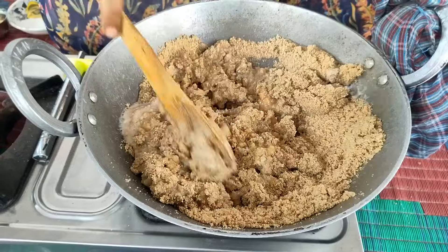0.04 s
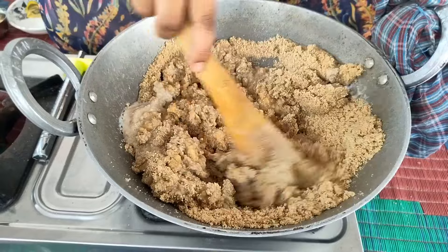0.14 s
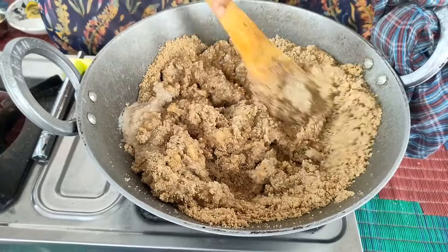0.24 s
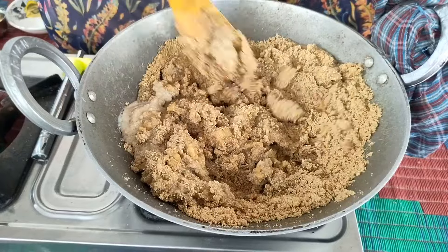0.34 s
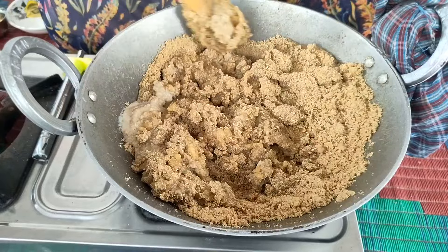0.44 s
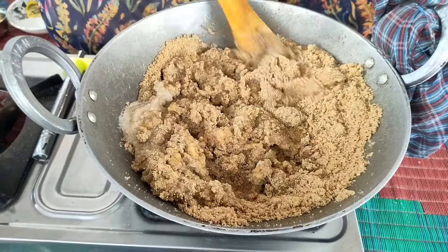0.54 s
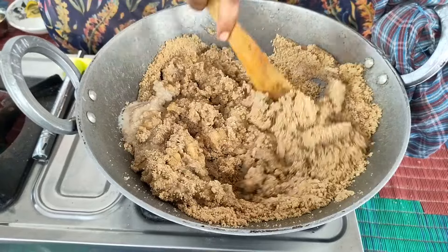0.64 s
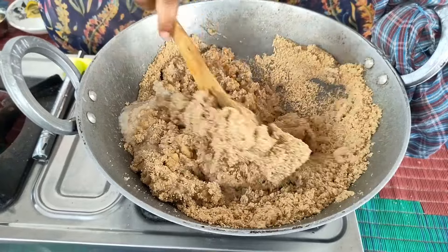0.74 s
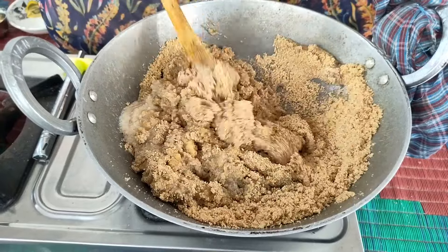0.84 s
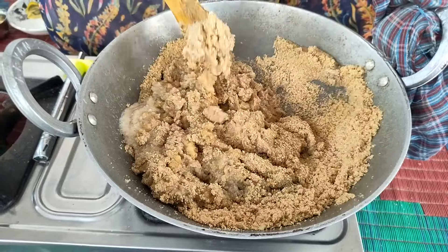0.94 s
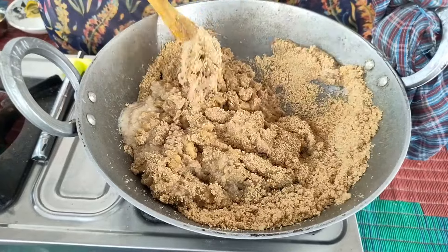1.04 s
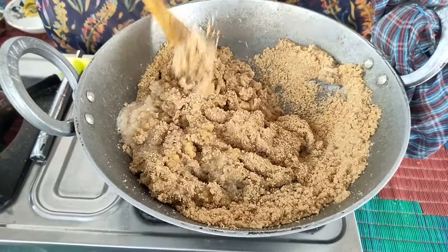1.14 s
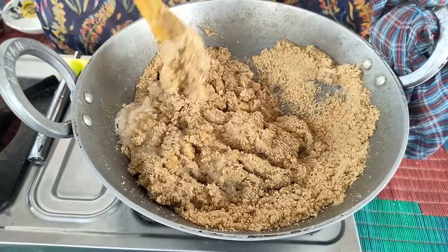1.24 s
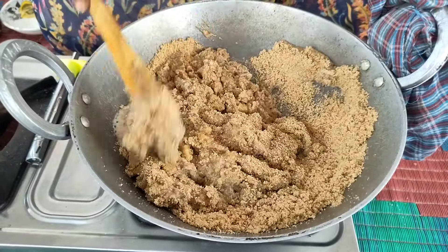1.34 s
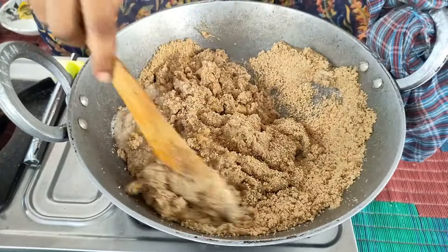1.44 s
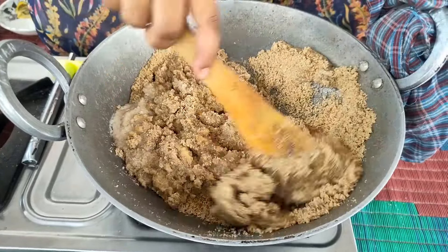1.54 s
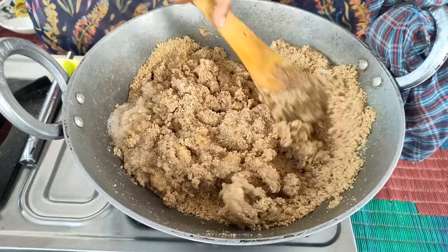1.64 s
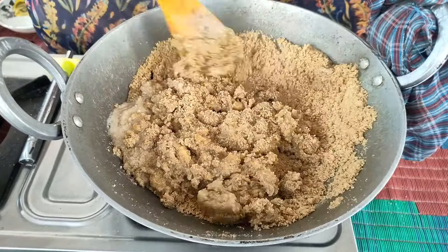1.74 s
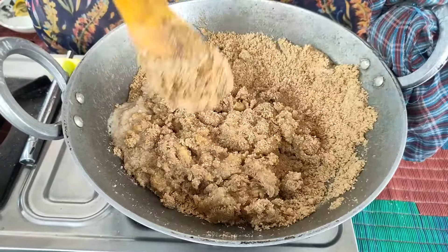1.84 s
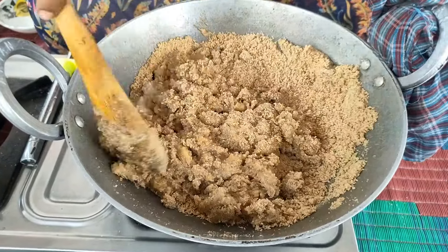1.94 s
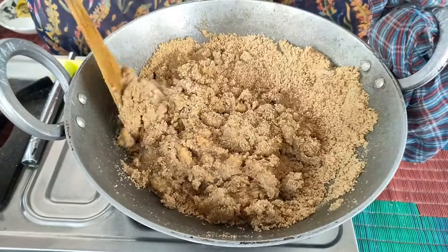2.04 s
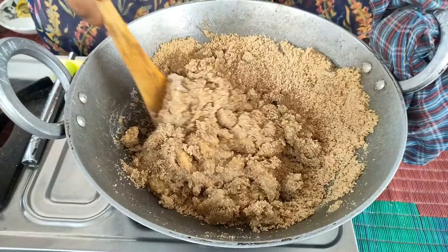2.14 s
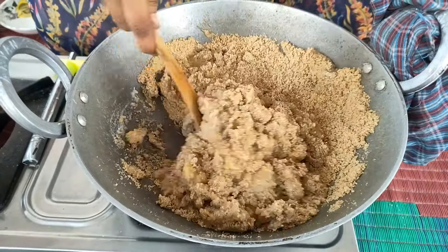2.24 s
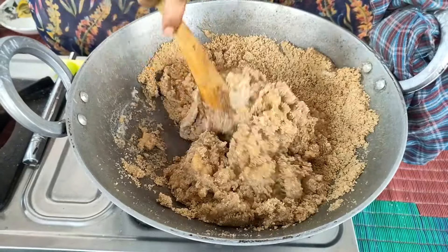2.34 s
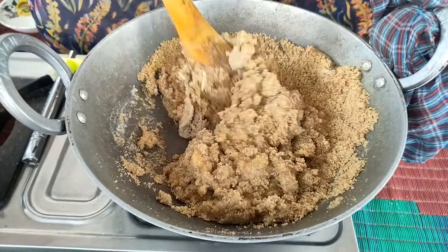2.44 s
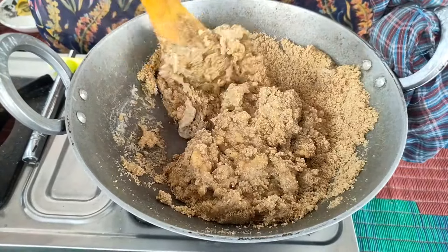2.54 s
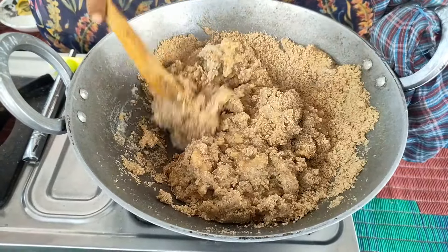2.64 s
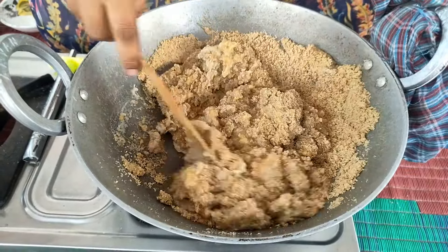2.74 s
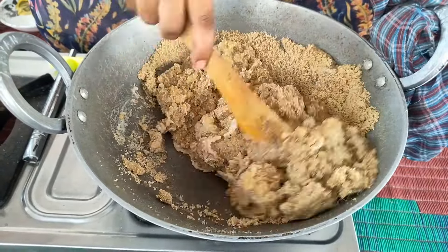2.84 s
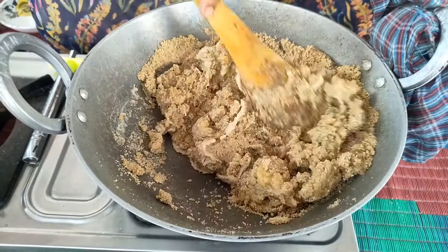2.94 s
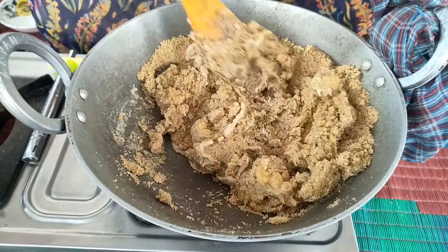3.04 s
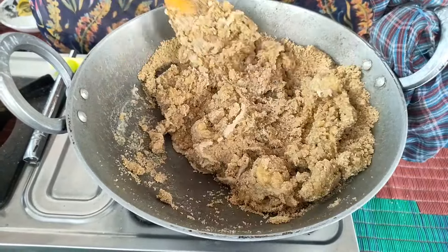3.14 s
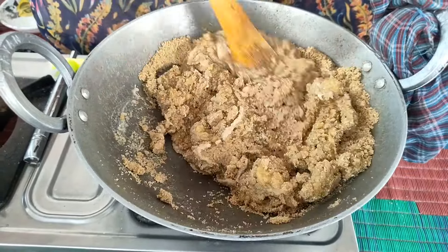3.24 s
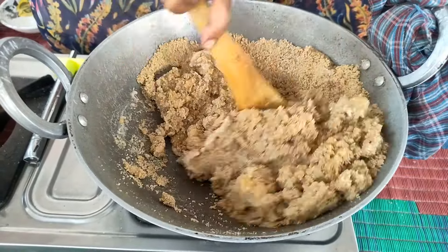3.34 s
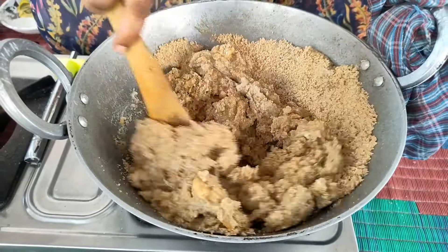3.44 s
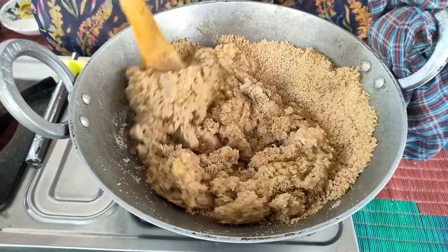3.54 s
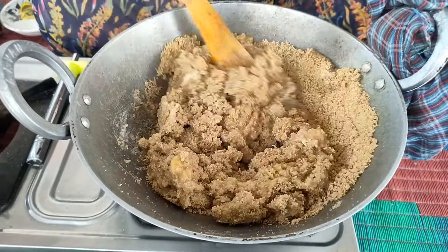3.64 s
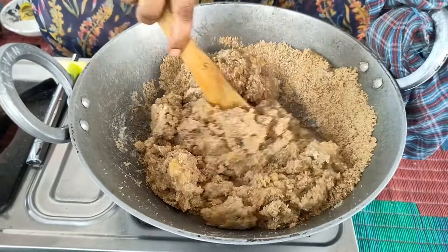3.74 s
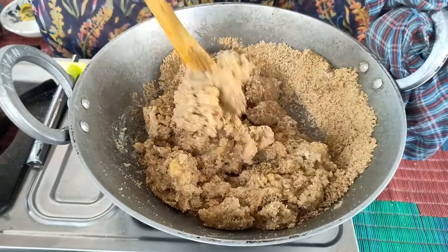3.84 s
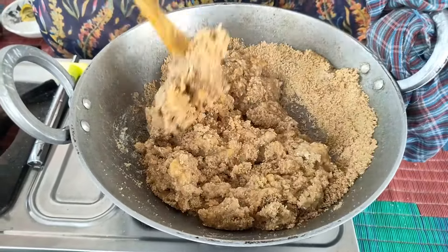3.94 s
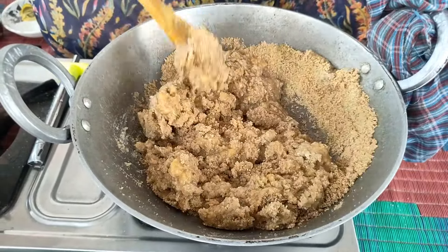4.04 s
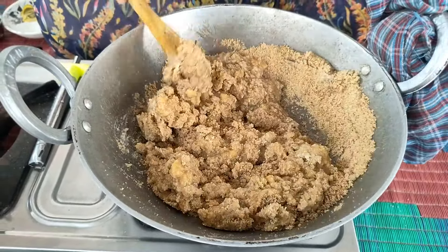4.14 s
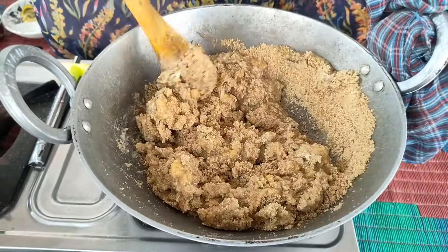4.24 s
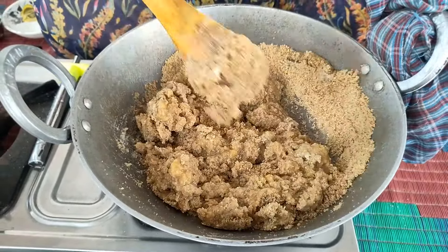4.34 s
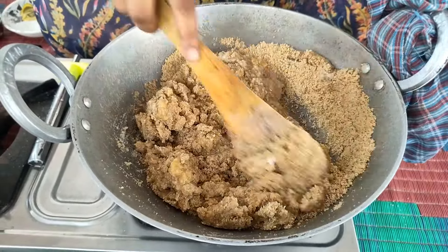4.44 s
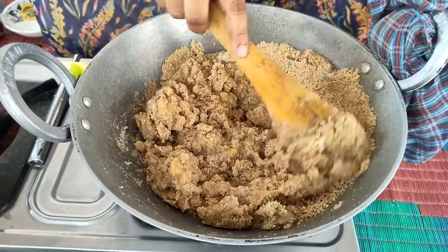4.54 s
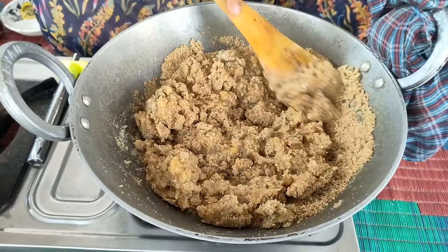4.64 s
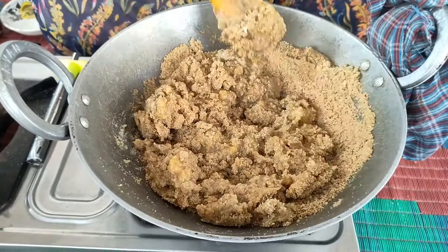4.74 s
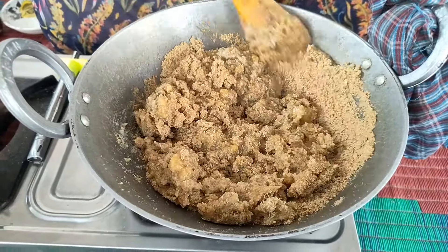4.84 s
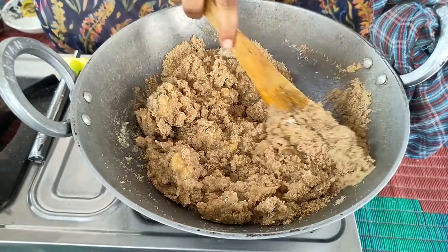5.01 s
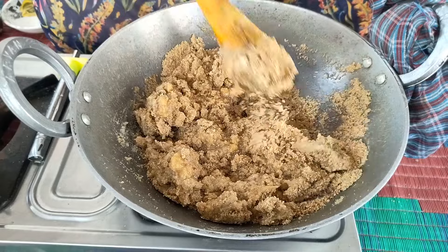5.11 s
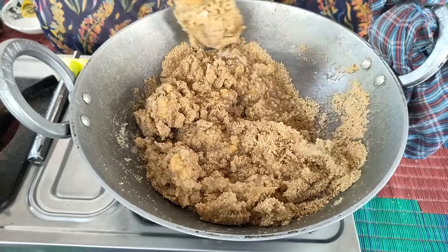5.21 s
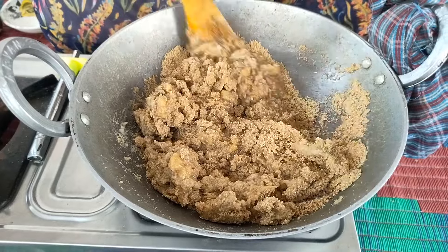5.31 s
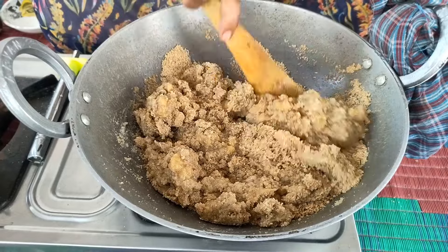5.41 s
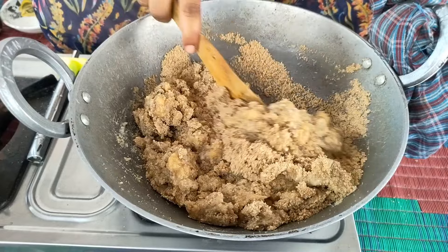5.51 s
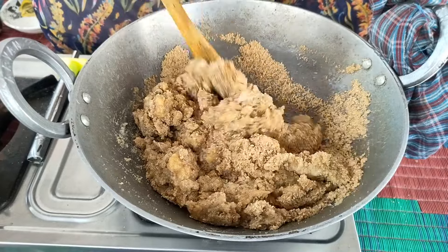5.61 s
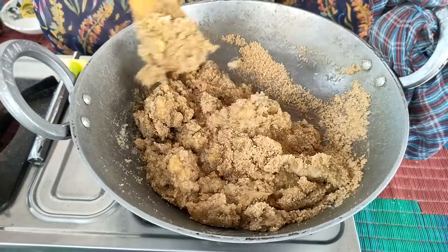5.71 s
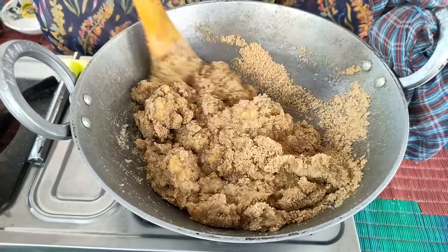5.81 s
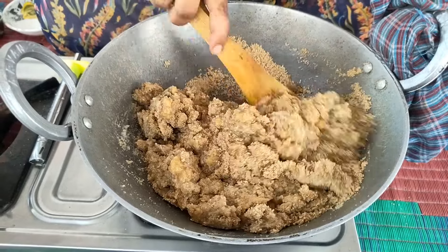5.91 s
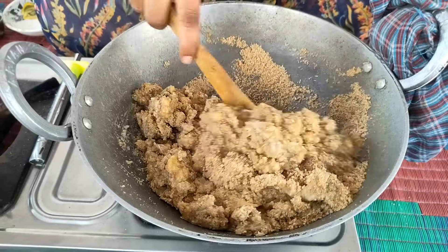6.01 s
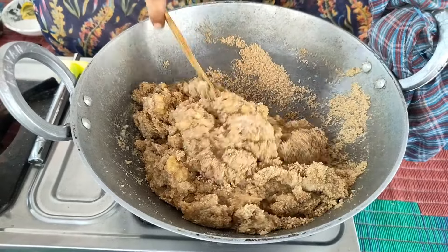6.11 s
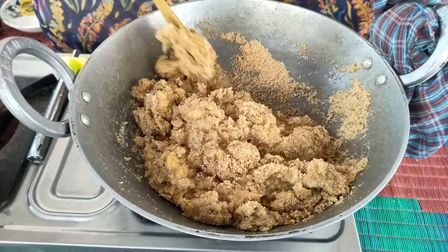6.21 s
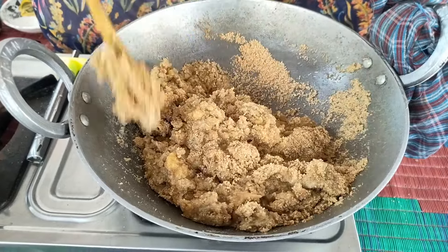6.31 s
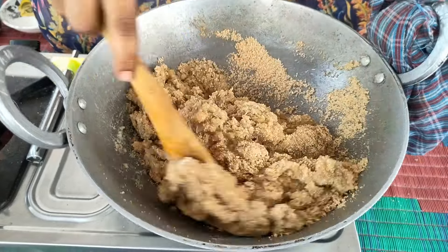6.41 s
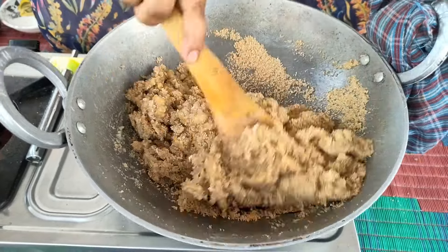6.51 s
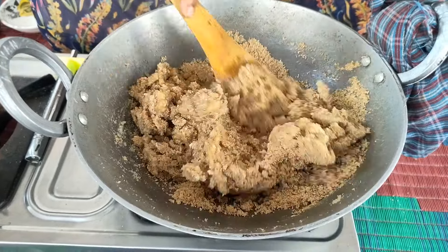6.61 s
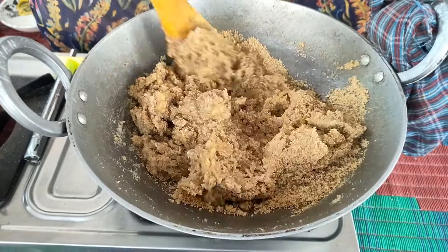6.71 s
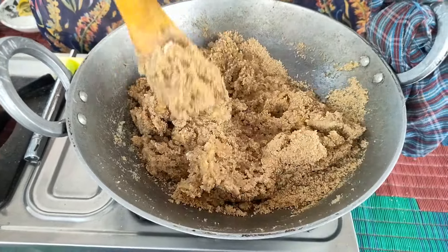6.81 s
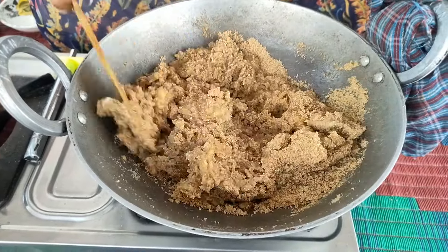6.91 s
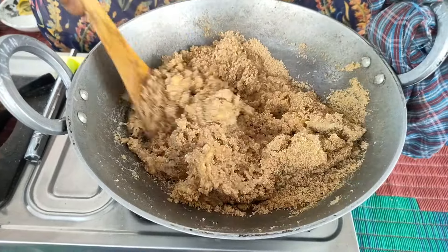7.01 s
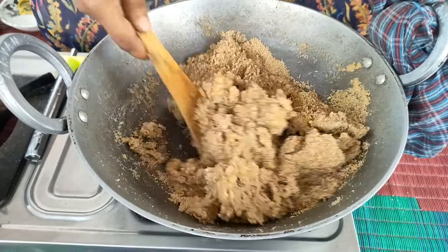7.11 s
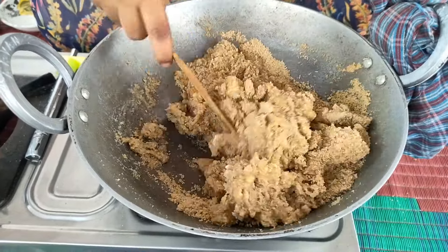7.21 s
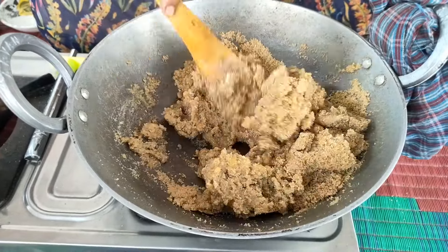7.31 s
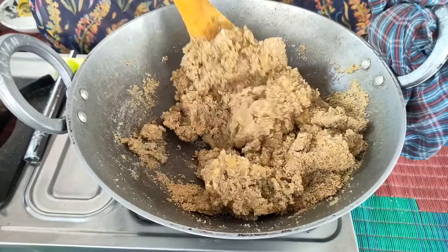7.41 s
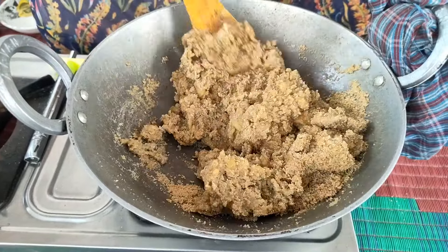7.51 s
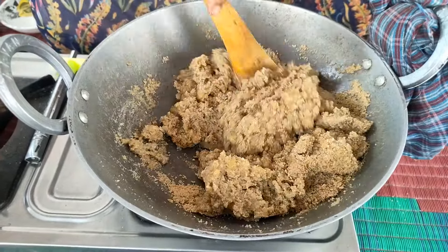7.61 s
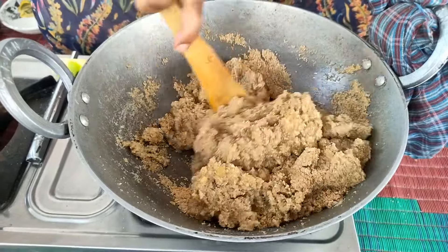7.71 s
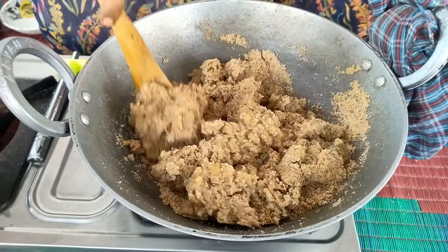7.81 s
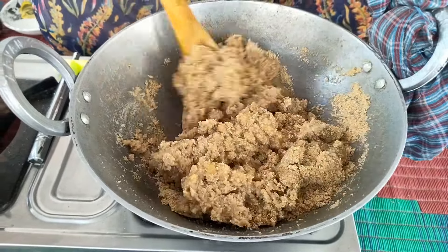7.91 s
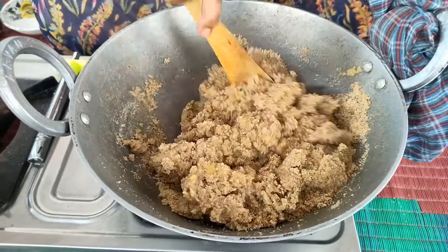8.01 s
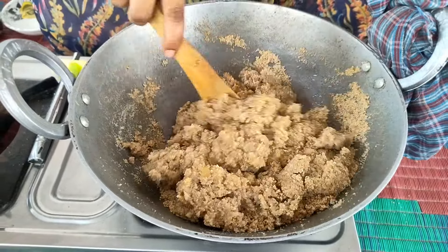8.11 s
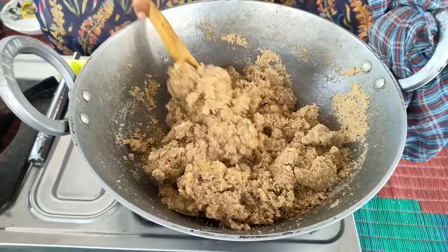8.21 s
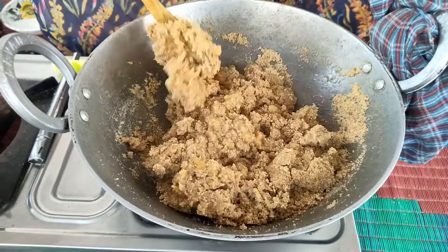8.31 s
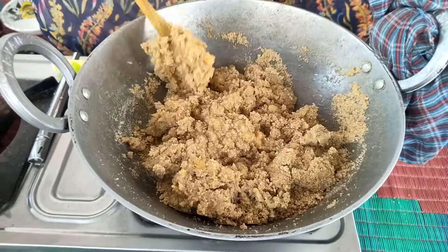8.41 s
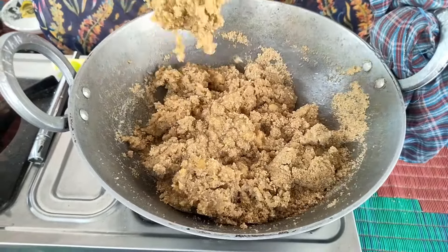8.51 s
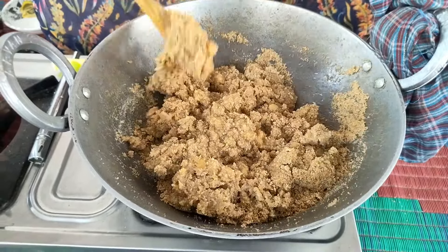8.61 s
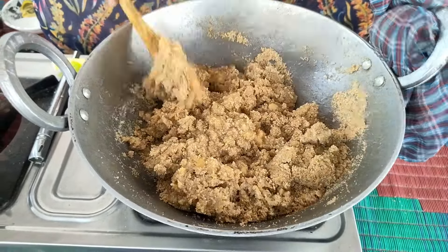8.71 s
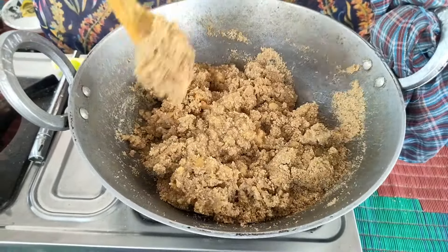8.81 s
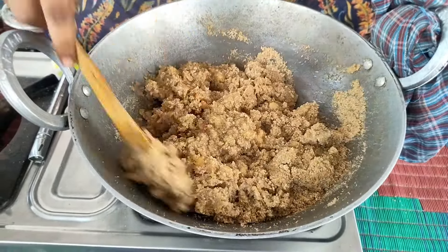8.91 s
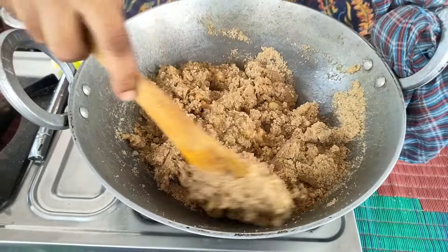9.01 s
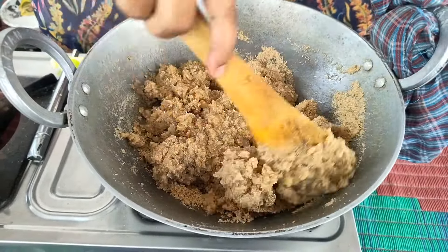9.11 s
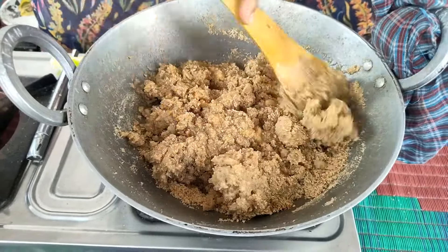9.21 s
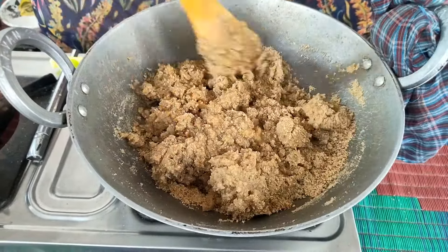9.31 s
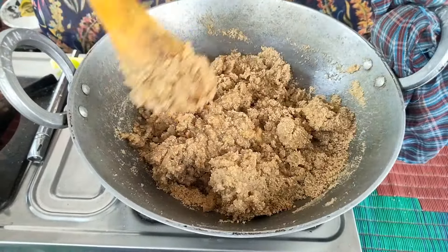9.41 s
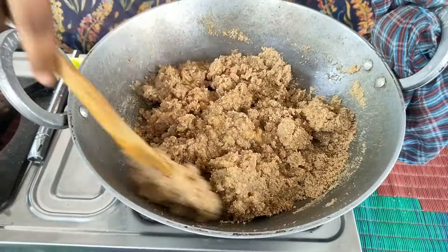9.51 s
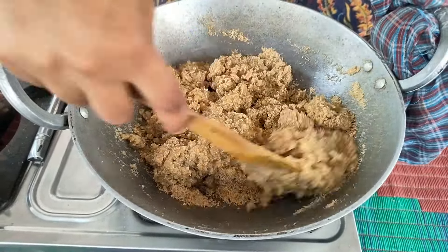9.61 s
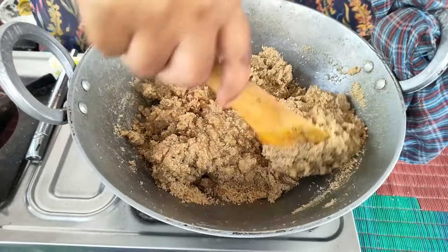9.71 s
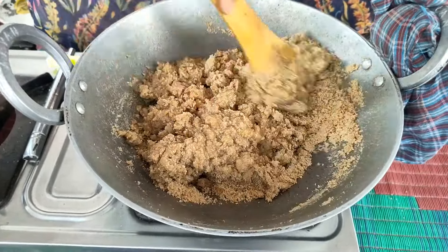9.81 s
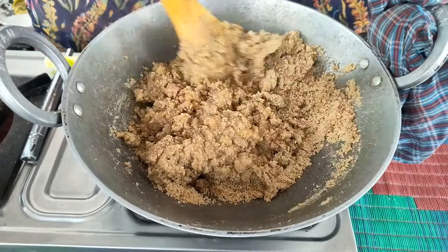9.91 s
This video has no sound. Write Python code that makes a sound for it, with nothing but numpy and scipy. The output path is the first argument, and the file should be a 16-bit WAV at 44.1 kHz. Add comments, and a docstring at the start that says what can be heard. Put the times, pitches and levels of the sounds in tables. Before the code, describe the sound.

Close up in a small home kitchen, a wooden spatula stirs crumbly dough in a metal pan with short, gritty scrapes and soft presses. Two loud raps on the rim come early, a small cluster before the middle and the hardest pair near the end, each making the pan rattle and clunk on its stand. A faint sizzle, low mains hum and tiny bird chirps outside lie underneath.

```python
"""In a small kitchen, close by, a wooden spatula stirs thick, crumbly dough in a metal pan on a stove.
Streams of tiny random impulses, filtered, make it scrape, crumble and press; narrow bands squeak on the wall.
Bursts of raps on the rim are ringing tones and noise; they rock the pan, whose modes ring on its stand.
Filtered grains make a faint frying hiss; a mains hum (a wavering sine) runs under quiet noise for the air.
A small bird chirps faintly outside: short gliding tones with an echo."""
import sys
import numpy as np
from scipy import signal
from scipy.fft import rfft, irfft, next_fast_len
from scipy.io import wavfile
from scipy.ndimage import uniform_filter1d, minimum_filter1d, map_coordinates

SR = 44100
rng = np.random.default_rng(int(sys.argv[2]) if len(sys.argv) > 2 else 0)


def wav_record(signal):
    """Record a signal, one row per channel, as 16-bit PCM in the file named by sys.argv[1]."""
    frames = np.transpose(np.atleast_2d(signal))
    bounded = np.clip(frames, -1, 1)
    # unit amplitude maps onto the largest positive 16-bit level
    quanta = np.round(bounded * 32767).astype(np.int16)
    wavfile.write(sys.argv[1], SR, quanta)


N = 438794  # length in samples

# Levels in the tables are relative: each function adds its own trim in dB.


def amp(db):
    """Turn decibels into a gain."""
    return 10 ** (np.asarray(db) / 20)


def unit(x):
    """Scale to an rms of 1."""
    return x / np.sqrt(np.mean(x ** 2) + 1e-20)


def along(points, hz):
    """Read a curve of (Hz, value) points, with straight lines on a log frequency axis."""
    f, v = np.transpose(points)
    return np.interp(np.log(hz + 1), np.log(f + 1), v)


def wobble(rate):
    """A smooth random curve through `rate` random points a second."""
    knots = rng.standard_normal(int(N * rate / SR) + 4)
    return map_coordinates(knots, [np.arange(N) * rate / SR])


def add(track, s, x):
    """Mix x into the track, starting at s seconds."""
    start = max(round(s * SR), 0)
    track[start:start + len(x)] += x[:len(track) - start]


def filtered(x, response):
    """Multiply the spectrum of x by a complex function of frequency."""
    n = x.shape[-1]
    m = 2 * next_fast_len(n // 2 + 4096)  # padded, so that tails do not wrap round
    return irfft(rfft(x, m) * response(np.fft.rfftfreq(m, 1 / SR)), m)[..., :n]


def coloured(x, points):
    """Shape x to a curve of gains in dB, with a filter that only acts after its input."""
    def response(hz):
        cepstrum = irfft(np.log(amp(along(points, hz))))
        half = len(cepstrum) // 2
        # folding the cepstrum forward in time gives minimum phase
        return np.exp(rfft(np.r_[cepstrum[0], 2 * cepstrum[1:half]], 2 * half))
    return filtered(x, response)


def resonate(x, modes):
    """Ring x through parallel resonances, each (centre Hz, width Hz, gain dB)."""
    def response(f):
        return sum(amp(db) * 1j * f * width / (centre * centre - f * f + 1j * f * width)
                   for centre, width, db in modes)
    return filtered(x, response)


def grains(rate, spread_db, size):
    """Tiny impulses at random moments, `rate` a second on average and uneven in strength, rms 1."""
    hits = rng.random(size) < rate / SR
    signs = rng.choice([-1, 1], size)
    return unit(hits * signs * amp(spread_db * rng.standard_normal(size)))


def body(force, colour, modes, ring_db):
    """A struck or rubbed body answers with a broad colour plus ringing modes, rms 1."""
    broad = unit(coloured(force, colour))
    ring = unit(resonate(force, modes))
    return unit(broad + amp(ring_db) * ring)


def echo(x, decay):
    """Smear x with a noise tail in which each frequency dies at its own speed."""
    hz, t, z = signal.stft(rng.standard_normal(SR // 2), SR, nperseg=256)
    fading = z * amp(-60 * t / along(decay, hz)[:, None])
    tail = signal.istft(fading, SR, nperseg=256)[1]
    return signal.fftconvolve(x, tail / np.linalg.norm(tail))[:N]


# Colour of dough grains scraped over metal. Each row: frequency in Hz, gain in dB.
SCRAPE_COLOUR = [(2000, -17.5), (4400, -1.5), (6000, -3), (8000, -4.5), (10000, -7.5), (12500, -16),
                 (15500, -38)]
# Colour of crumbling dough. Each row: frequency in Hz, gain in dB.
CRUMBLE_COLOUR = [(400, -24), (800, -9.5), (1200, 6), (2000, 5), (3000, -2.5), (4500, -4), (8000, -43.5)]
# Colour of dough pressed on the pan. Each row: frequency in Hz, gain in dB.
PUSH_COLOUR = [(60, -28.5), (180, -14.5), (300, -6.5), (450, 5), (780, 1), (1200, -1.5), (3000, -49.5)]
# Resonances of the loaded pan, also used by the blows below.
# Each row: frequency in Hz, width in Hz, gain in dB.
PAN_MODES = [(375, 20, 2), (485.5, 33, 5), (555, 55, -1), (673, 25, -6), (892, 28, -3.5), (1090, 36, -9),
             (1333, 48, -7.5), (1540, 49, -11)]


def stirring():
    """Grains of dough drag over the metal, break apart and press on the pan, all in small jerks."""
    scrape_db, crumble_db, push_db, centre, bare = strokes()
    jerk_db = 1.5 * wobble(60) + 1.6 * wobble(190)

    dragging = travelling(coloured(grains(4200, 4.0, N), SCRAPE_COLOUR))
    grit = gliding(dragging, centre) + amp(-19.5) * crumbs(rate=53, hz=6450, cycles=3)
    ringing = wall(grains(600, 3, N))
    scrape = np.sqrt(1 - bare) * grit + np.sqrt(bare) * ringing
    scrape = amp(scrape_db + jerk_db / 2) * scrape  # scraping jerks half as much, in dB

    rubbing = travelling(coloured(grains(2500, 1.8, N), CRUMBLE_COLOUR))
    clots = crumbs(rate=220, hz=1537, cycles=6.4)
    crumble = amp(crumble_db - 2.7) * unit(rubbing + clots / 2)

    pressing = travelling(body(grains(900, 1.2, N), PUSH_COLOUR, PAN_MODES, ring_db=-7.0))
    pops = crumbs(rate=55, hz=816, cycles=4.1)
    push = amp(push_db - 2.0) * unit(pressing + pops / 2)
    return scrape + (crumble + push) * amp(jerk_db)


# Strokes of the spatula. Each row: start in seconds, rise in seconds, hold in seconds, level of scraping
# on metal in dB, of crumbling dough in dB, of pushing on the pan in dB, centre of the scrape in Hz.
SPATULA_STROKES = [(-.2, 0.39, 0.062, -47.5, -46.5, -50, 5300),
                   (0.271, 0.014, 0.0033, -39.5, -45, -42, 6690),
                   (0.573, 0.025, 0.012, -41.5, -55, -72, 7340),
                   (0.654, 0.034, .12, -54.5, -61, -59.5, 7190),
                   (1.525, 0.067, 0.029, -41, -49.5, -49.5, 7000),
                   (1.614, 0.044, 0.13, -52.5, -61, -61, 6920), (2.001, 0.22, 0.26, -49, -50, -55.5, 8050),
                   (2.51, 0.098, 0.32, -46, -47, -63, 5560), (2.773, 0.129, 0.04, -39, -48, -49.5, 6710),
                   (2.949, 0.12, 0.099, -45, -43, -64, 8100),
                   (3.225, 0.28, 0.039, -37.5, -40.5, -44.5, 7000),
                   (3.776, 0.02, 0.09, -49, -46, -48.5, 7470), (4.927, 0.1, 0.01, -44, -62.5, -61, 6830),
                   (5.34, 0.03, 0.14, -45, -62.5, -65.5, 6810),
                   (5.449, 0.071, 0.015, -39, -44, -50.5, 6970), (5.839, .13, 0.075, -39, -49, -50, 6200),
                   (6.118, 0.076, 0.24, -48, -61.5, -63, 5400), (6.473, 0.017, 0.046, -40, -42, -46, 6115),
                   (6.508, 0.082, 0.27, -47.5, -60, -73, 5310), (7.088, 0.12, 0.043, -43, -46, -45.5, 7700),
                   (7.27, 0.11, 0.2, -48.5, -60, -67.5, 6820), (7.662, 0.045, 0.016, -41, -48, -45.5, 6880),
                   (7.738, 0.04, 0.1, -42, -46, -46.5, 6650), (7.925, 0.034, 0.11, -59.5, -53, -59, 7940),
                   (8.09, .07, 0.075, -50, -53.5, -59, 7570), (8.276, 0.058, 0.04, -61, -54.5, -49.5, 5910),
                   (9.031, 0.033, 0.08, -49.5, -49, -51, 6870), (9.128, 0.049, 0.023, -42, -50, -38, 6010),
                   (9.274, 0.015, 0.022, -45, -46.5, -45.5, 7190),
                   (9.618, 0.085, 0.032, -36.5, -37.5, -46.5, 7020),
                   (9.776, 0.039, 0.074, -49.5, -44.5, -48, 5010)]
# Levels between strokes, in one row: scraping in dB, crumbling in dB, pushing in dB.
RESTING_DB = [-67, -66.5, -71]
SWELL_POWER, PUSH_POWER = 1.44, 1.53  # bend of the rise; pushing follows mostly the height of the effort
RELEASE_S, RELEASE_SHARE = 0.015, 0.38  # effort falls to 1/e in this time plus this share of rise + hold
TRICKLE_DB, TRICKLE_S = -23, 0.13  # loose dough slides back after a stroke: its level and 1/e time
BARE_S, BARE_SHARE = 0.13, 0.54  # strokes shorter than this stay on bare metal; greatest ringing share


def strokes():
    """Each stroke swells, holds and lets go: gives three levels in dB, scrape centre in Hz, ringing share."""
    t = np.arange(0, N, 32) / SR  # a coarse time grid is enough
    power = amp(RESTING_DB)[:, None] ** 2 * np.ones(len(t))
    # centre and ringing share are averages weighted by the scraping power
    centre = np.mean([row[-1] for row in SPATULA_STROKES]) * power[0]
    bare = np.zeros(len(t))
    for s, rise, hold, scrape_db, crumble_db, push_db, centre_hz in SPATULA_STROKES:
        attack = np.clip((t - s) / rise, 0, 1) ** SWELL_POWER
        after = np.maximum(t - s - rise - hold, 0)
        effort = attack * np.exp(-after / (RELEASE_S + RELEASE_SHARE * (rise + hold)))
        trickle = attack * amp(TRICKLE_DB) * np.exp(-after / TRICKLE_S)
        sliding = np.maximum(effort, trickle)
        scrape, crumble = amp(scrape_db) * sliding, amp(crumble_db) * sliding
        push = amp(push_db) * effort ** PUSH_POWER
        layers = np.array([scrape, crumble, push]) ** 2
        power += layers
        centre += centre_hz * layers[0]
        bare += BARE_SHARE / (1 + ((rise + hold) / BARE_S) ** 6) * layers[0]
    curves = (*(10 * np.log10(power)), centre / power[0], bare / power[0])
    return [np.interp(np.arange(N) / SR, t, curve) for curve in curves]


def travelling(x):
    """The contact point moves over the pan: its fine resonances and broad colour keep changing, rms 1."""
    hz, t, z = signal.stft(x, SR, nperseg=1024)

    def patches(size, frames):
        """Random values smoothed over `size` frequency bins and, twice, over `frames` time frames."""
        field = uniform_filter1d(rng.standard_normal(z.shape), size, 0)
        for _ in range(2):
            field = uniform_filter1d(field, frames, axis=1, mode="wrap")
        return unit(field)
    gain_db = 4 * patches(size=2, frames=7) + 2.8 * patches(size=18, frames=2)
    return unit(signal.istft(z * amp(gain_db), SR, nperseg=1024)[1][:N])


HUMP_DB, HUMP_OCTAVES = 7.5, 0.26  # resonance under the blade: height and half width


def gliding(x, centre):
    """A broad resonance under the blade moves along the centre curve, rms 1."""
    hz, t, z = signal.stft(x, SR, nperseg=512)
    octaves = np.log2((hz[:, None] + 1) / np.interp(t, np.arange(N) / SR, centre))
    hump_db = HUMP_DB * np.exp(-(octaves / HUMP_OCTAVES) ** 2 / 2)
    return unit(signal.istft(z * amp(hump_db), SR, nperseg=512)[1][:N])


def crumbs(rate, hz, cycles):
    """Clots of dough tear and drop one by one: short damped pops, each at its own pitch, rms 1."""
    draws = rng.random((int(rate * N / SR), 3))  # one row a pop: place, pitch, strength
    t = np.arange(SR // 40) / SR
    pitch = hz * 4 ** (draws[:, 1:2] - .5)  # up to an octave either way
    strength = amp(14 * draws[:, 2:])
    pops = strength * np.sin(2 * np.pi * pitch * t) * np.exp(-pitch * t / cycles)
    where = (draws[:, :1] * N).astype(int) + np.arange(len(t))
    return unit(np.bincount(where.ravel(), pops.ravel(), N)[:N])


# Ringing of the bare wall under the blade. Each row: frequency in Hz, gain in dB.
WALL_MODES = [(5510, 0), (5830, 1), (6220, 3.5), (6520, 1), (7280, 3), (7740, 1), (8340, -6.5), (9820, -9),
              (10700, -11.5)]


def wall(force):
    """The bare metal rings with its high modes and stays hollow below them, rms 1."""
    ring = resonate(force, [(hz, 45, db) for hz, db in WALL_MODES])  # each 45 Hz wide
    band = signal.butter(5, (5000, 11500), "band", fs=SR, output="sos")
    return unit(signal.sosfilt(band, ring))


# Raps on the rim and their rebounds. Each row: start in seconds, crack level in dB, rocking level in dB,
# rocking time in seconds, brightness (noise against wood) in dB, treble width from 0 to 1.
RIM_RAPS = [(1.1331, -12.5, -24, 0.041, -7.5, 0), (1.261, -9.5, -18.5, 0.04, -2.5, 0.33),
            (4.098, -22.5, -34, 0.018, -6.5, 0.98), (4.2195, -13, -15, 0.039, -5, 0.7),
            (4.253, -29, -38, 0.0118, 14.5, 0.95), (4.35, -14, -24, 0.029, -4, 1),
            (6.681, -28.5, -25.5, 0.027, -2.5, 0), (8.685, -11, -11, 0.048, -6, 0.02),
            (8.836, -6, -13.5, 0.039, 6.5, 0.01), (8.863, -23.5, -24, 0.059, 11, 0),
            (9.857, -23, -18.5, 0.01, 5.5, 0)]
# Tones of spatula and rim at the blow. Each row: frequency in Hz, level in dB, time to fall 60 dB in seconds.
RIM_TONES = [(367, -8, 0.079), (517, -7.5, 0.027), (1105, -3.5, .025), (2180, -10, 0.019),
             (2660, -2.5, 0.014), (3170, -4.5, 0.017), (3800, -8.5, 0.012), (5280, -11, 0.031),
             (6480, -12, 0.039), (7880, -10.5, 0.013)]
# Colour of the noise in the crack. Each row: frequency in Hz, gain in dB.
CRACK_COLOUR = [(60, -30.5), (200, -36), (400, 5.5), (1500, 2.5), (2300, -6.5), (3200, 0), (5600, 0),
                (8000, -8.5), (15000, -32.5)]
# Colour of the pan rocking, also used for its clunks. Each row: frequency in Hz, gain in dB.
ROCK_COLOUR = [(40, -31), (120, -15.5), (240, -14), (370, 4), (750, 2.5), (1300, -4.5), (2200, -13),
               (5000, -24.5), (15000, -53)]
# The wooden blade's note rises while it is pressed on the rim: its time, two pitches and level.
THOCK_S, THOCK_HZ, THOCK_END_HZ, THOCK_DB = .008, 1062, 2060, 3.5


def raps():
    """A hard crack on the rim; then the pan chatters on its stand and settles. Gives mid and side."""
    mid, side = np.zeros(N), np.zeros(N)
    t = np.arange(SR // 3) / SR
    treble = signal.butter(8, 4800, "high", fs=SR, output="sos")
    for s, crack_db, rock_db, rock_time, bright_db, width in RIM_RAPS:
        ring = np.zeros(len(t))
        for hz, db, t60 in RIM_TONES:
            fade = amp(db + rng.standard_normal() - 60 * t / t60)
            ring += fade * np.sin(2 * np.pi * (hz * rng.normal(1, 0.015) * t + rng.random()))
        ring *= 1 - np.exp(-t / 0.0011)
        pressed = np.minimum(t / THOCK_S, 1)
        thock_hz = THOCK_HZ + (THOCK_END_HZ - THOCK_HZ) * pressed
        thock = np.sin(np.pi * pressed) ** 2 * np.sin(2 * np.pi * np.cumsum(thock_hz) / SR)
        wood = unit(unit(ring) + amp(THOCK_DB) * unit(thock))
        contact = (1 - np.exp(-t / 0.013)) * np.exp(-(t / 0.0049) ** 2)
        snap, spray = coloured(rng.standard_normal((2, len(t))) * contact, CRACK_COLOUR)
        crack = unit(wood + amp(bright_db + 0.5) * unit(snap))
        add(mid, s, amp(crack_db - 13.0) * crack)
        # treble noise spreads the crack between left and right
        spray = signal.sosfilt(treble, spray)
        add(side, s, width * amp(crack_db - 27.0) * unit(spray))

        late = np.maximum(t - rock_time, 0)  # time since the rocking ended
        settling = (1 - np.exp(-t / 0.0049)) * amp(-60 * late / 0.15 - 5 * t / rock_time)
        chatter = unit(coloured(grains(800, 3.0, len(t)) * settling, ROCK_COLOUR))
        # the pan's own modes are kept ringing for as long as it rocks
        drone = np.zeros(len(t))
        for hz, band, db in PAN_MODES:
            fade = amp(db + 2 * rng.standard_normal()) * np.exp(-np.pi * band * late)
            drone += fade * np.sin(2 * np.pi * (hz * t + rng.random()))
        drone = unit(drone * (1 - np.exp(-t / 0.0072)) * amp(-3 * t / rock_time))
        rocking = np.std(settling) * (chatter + amp(-2.5) * drone)
        add(mid, s + .003, amp(rock_db + 1.5) * rocking)
    return mid, side


# The pan drops back on its stand. Each row: start in seconds, level in dB.
STAND_CLUNKS = [(1.273, -8), (4.234, -10.5), (8.699, -7), (8.716, -7), (8.92, -32)]


def clunks():
    """The rocking pan lands on its stand: a short noise burst sounds its body as a low knock."""
    out, t = np.zeros(N), np.arange(SR // 4) / SR
    for s, db in STAND_CLUNKS:
        burst = rng.standard_normal(len(t)) * amp(-60 * t / 0.016)
        add(out, s, amp(db - 24) * body(burst, ROCK_COLOUR, PAN_MODES, ring_db=-4.5))
    return out


# Soft bumps of the spatula inside the pan.
# Each row: time in seconds (the sound starts 1 ms before), knock level in dB, scrape level in dB.
SOFT_BUMPS = [(0.244, -20, -26), (.298, -25, -43), (1.593, -31.5, -42.5), (2.058, -33, -67),
              (2.884, -27.5, -46), (3.562, -22.5, -38.5), (3.784, -22, -35), (5.042, -29, -39),
              (5.532, -28.5, -29), (6.485, -25, -30), (7.235, -26, -34.5), (7.683, -36.5, -42.5),
              (7.797, -33, -29.5), (8.11, -28.5, -45.5), (8.517, -23.5, -64.5), (8.536, -22, -60),
              (9.179, -26, -32.5), (9.284, -29.5, -33), (9.346, -21.5, -40.5), (9.622, -31.5, -42),
              (9.822, -28, -61.5)]
# Colour of the dull knock. Each row: frequency in Hz, gain in dB.
KNOCK_COLOUR = [(250, -18), (480, 2.5), (1300, -3.5), (2300, -16.5), (5000, -24), (12000, -53)]


def bumps():
    """Dough cushions these blows: a dull knock and a short skid that rings the wall."""
    out, t = np.zeros(N), np.arange(SR // 4) / SR
    cushion = 1 - np.exp(-t / 0.0022)
    for s, db, scrape_db in SOFT_BUMPS:
        blow = grains(2500, 1.8, len(t)) * amp(-60 * t / 0.085)
        knock = body(blow, KNOCK_COLOUR, PAN_MODES, ring_db=-4.5)
        slips = grains(5900, 2.4, len(t)) * amp(-60 * t / 0.1)
        skid = unit(wall(slips) + amp(-10.0) * unit(coloured(slips, SCRAPE_COLOUR)))
        add(out, s - .001, cushion * (amp(db - 23.0) * knock + amp(scrape_db - 16.5) * skid))
    return out


# Crumbs snapping. Each row: start in seconds, pitch in Hz, level in dB.
CRUMB_TICKS = [(0.419, 5600, -23), (2.132, 13000, -24), (3.157, 7000, -21), (4.868, 5500, -26.5),
               (8.371, 2770, -25.5), (8.52, 5360, -17)]


def ticks():
    """A dry crumb snaps: a very short noise burst passes one band twice."""
    out, t = np.zeros(N), np.arange(SR // 4) / SR
    for s, hz, db in CRUMB_TICKS:
        band = [(hz, 1600, 0)]
        burst = rng.standard_normal(len(t)) * amp(-60 * t / .008)
        snap = resonate(resonate(burst, band), band)
        add(out, s, amp(db - 40.0) * unit(snap))
    return out


# Wood sticking and slipping on metal, from single slips to long rubs.
# Each row: start in seconds, length in seconds, pitch in Hz, level in dB.
WOOD_SQUEAKS = [(0, 0.62, 3080, -55), (0, 0.35, 1360, -53), (0.082, 0.22, 3160, -47.5),
                (0.033, 0.22, 1900, -56), (0.11, 0.12, 5600, -44), (2.088, 0.14, 2360, -54),
                (2.172, 0.0026, 2500, -40.5), (2.188, 0.0038, 2260, -41), (2.254, 0.033, 1500, -46.5),
                (2.74, 0.046, 5100, -40.5), (2.813, 0.046, 4540, -39), (3.556, 0.017, 910, -32.5),
                (3.605, 0.046, 885, -43), (5.733, 0.15, 2210, -57.5), (5.898, 1.43, 9700, -60),
                (6.675, 0.037, 930, -24.5), (6.821, 0.036, 2280, -46.5), (7.01, 0.039, 1150, -47.5),
                (7.007, 0.025, 2720, -50), (7.054, 0.07, 2370, -46.5), (9.174, 0.055, 1180, -35)]


def squeaks():
    """Quick uneven slips of the blade ring one narrow band."""
    out = np.zeros(N)
    for s, length, hz, db in WOOD_SQUEAKS:
        swell = signal.windows.tukey(int(length * SR), .5)
        band = [(hz, 0.26 * hz, 0)]
        slips = swell * grains(2000, 3.8, len(swell))
        slips = np.pad(slips, (0, SR // 100))  # room to ring on
        add(out, s, amp(db - 2.5) * unit(resonate(resonate(slips, band), band)))
    return out


# Lumps of dough dropping. Each row: start in seconds, level in dB.
DOUGH_LUMPS = [(9.735, -30.5)]


def lumps():
    """A falling lump lands with a low, soft thud: fading noise through one low resonance."""
    out, t = np.zeros(N), np.arange(SR // 4) / SR
    for s, db in DOUGH_LUMPS:
        burst = rng.standard_normal(len(t)) * amp(-60 * t / 0.24)
        add(out, s, amp(db - 19.0) * unit(resonate(burst, [(165, 47, 0)])))
    return out


# Dry, sandy crumbs sliding down the wall. Each row: start in seconds, length in seconds, level in dB.
CRUMB_SIFTS = [(2.053, 1.5, -64), (8.075, 0.24, -65)]
# Colour of the sandy crumbs. Each row: frequency in Hz, gain in dB.
SAND_COLOUR = [(7000, -30.5), (11000, -4.5), (13500, -2), (15500, -11)]


def sifts():
    """The finest crumbs slide over the metal with a very high hiss."""
    out = np.zeros(N)
    for s, length, db in CRUMB_SIFTS:
        swell = signal.windows.tukey(int(length * SR), .5)
        hiss = unit(coloured(grains(6000, 2, len(swell)), SAND_COLOUR))
        add(out, s, amp(db) * swell * hiss)
    return out


# Colour of the frying hiss. Each row: frequency in Hz, gain in dB.
SIZZLE_COLOUR = [(2500, -24), (3600, -9), (6400, -5), (11000, -27.5)]
SIZZLE_DB, SIZZLE_FALL_DB_PER_S = -59.5, 2  # level at the start, and how fast it quietens


def sizzle():
    """The hot dough fries with a faint, fine hiss of dense grains that dies down."""
    t = np.arange(N) / SR
    hiss = unit(coloured(grains(9000, 2, N), SIZZLE_COLOUR))
    return amp(SIZZLE_DB - SIZZLE_FALL_DB_PER_S * t) * hiss


# Chirps of the bird. Each row: time in seconds (the sound starts 8 ms before), level in dB.
BIRD_CHIRPS = [(3.941, -44.5), (4.129, -44), (4.334, -43.5), (4.53, -46), (4.735, -48), (4.96, -53),
               (5.16, -49), (6.36, -49), (6.56, -43), (6.75, -48), (8.44, -50), (8.621, -49)]
# Notes of one chirp. Each row: delay in seconds, length in seconds, start pitch in Hz, end pitch in Hz,
# level in dB, pitch tremble as a share of the pitch.
CHIRP_NOTES = [(0, .056, 6500, 4900, -1, .04), (0.047, 0.031, 4380, 3980, 3.5, .006),
               (0.074, .026, 3330, 3620, 0, .006)]
# Echo of the walls outside. Each row: frequency in Hz, time to fall 60 dB in seconds.
YARD_ECHO = [(3000, .22), (7000, .22)]


def bird():
    """Chirps of three short notes, the first a buzzy downward slur, smeared by the walls outside."""
    out = np.zeros(N)
    for s, db in BIRD_CHIRPS:
        for delay, length, start_hz, end_hz, note_db, tremble in CHIRP_NOTES:
            size = int(length * SR)
            waver = unit(uniform_filter1d(rng.standard_normal(size), size=60))
            hz = np.linspace(start_hz, end_hz, size) * (1 + tremble * waver)
            hz = hz * rng.normal(1, .006)  # no two notes quite alike
            note = signal.windows.hann(size) * np.sin(2 * np.pi * np.cumsum(hz) / SR)
            level = amp(db + note_db + rng.standard_normal())
            add(out, s + delay - .008, level * echo(note, YARD_ECHO))
    return out


def hum():
    """Mains hum: one steady low sine whose phase and level waver slightly."""
    t = np.arange(N) / SR
    tone = np.sqrt(2) * np.sin(2 * np.pi * 99.6 * t + .04 * wobble(2.7))
    return amp(-52.5 + .3 * wobble(4.6)) * tone


# Colour of the quiet air of the room. Each row: frequency in Hz, gain in dB.
AIR_COLOUR = [(25, -14.5), (99, -4.5), (173, -20.5), (281, -11), (433, -24), (2920, -36), (3530, -27),
              (15000, -56.5)]


def air():
    """The quiet air of the room is steady noise, strongest in the bass."""
    return amp(-56.5) * unit(coloured(rng.standard_normal(N), AIR_COLOUR))


# Echo of the kitchen. Each row: frequency in Hz, time to fall 60 dB in seconds.
KITCHEN_ECHO = [(300, 0.17), (2000, 0.14), (12000, 0.037)]


def scene():
    """All sounds of the pan share the kitchen's echo; bird, hum and air join them. Gives left and right."""
    knocks, side = raps()
    pan = stirring() + knocks + clunks() + bumps() + ticks() + squeaks() + lumps() + sifts() + sizzle()
    mid = pan + amp(-12.5) * echo(pan, KITCHEN_ECHO) + bird() + hum() + air()
    return np.array([mid + side, mid - side])


def record(dry):
    """A fast limiter turns peaks above full scale down to it; then all above 15.8 kHz is cut."""
    needed = 1 / np.maximum(np.abs(dry).max(0), 1)
    gain = uniform_filter1d(minimum_filter1d(needed, size=89), size=89)  # 89 samples: about 2 ms
    return filtered(dry * gain, lambda hz: hz < 15800)


dry = scene()
out = record(dry)
wav_record(out)
```